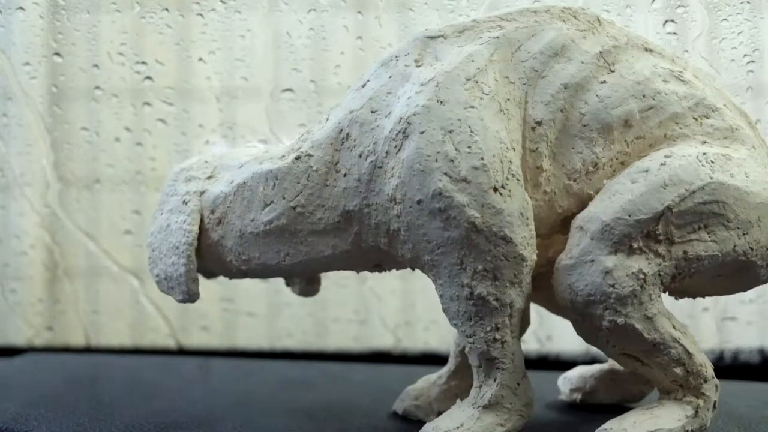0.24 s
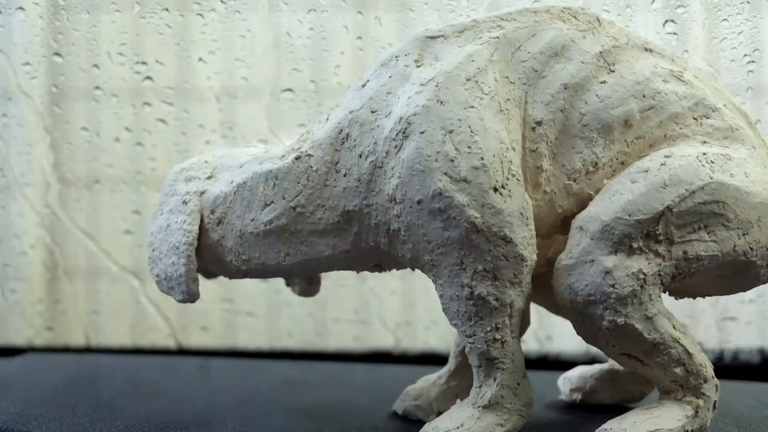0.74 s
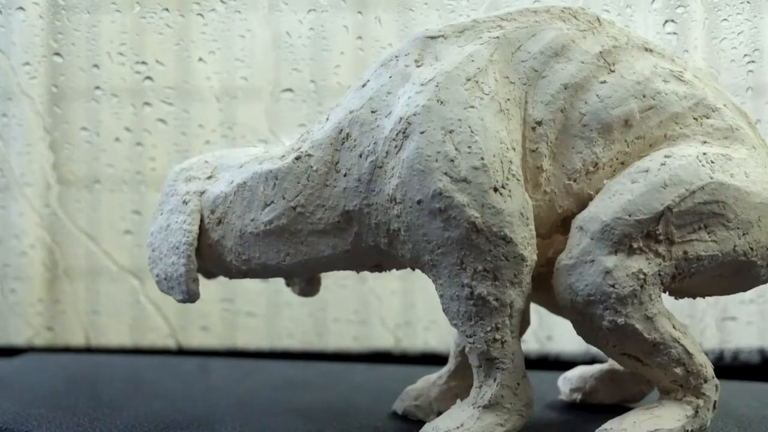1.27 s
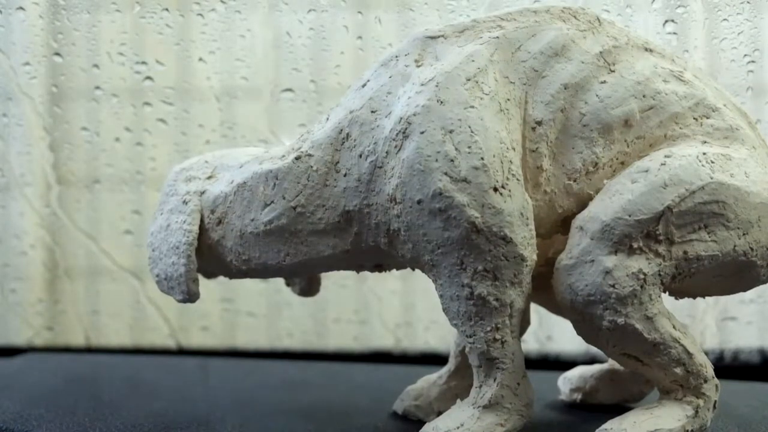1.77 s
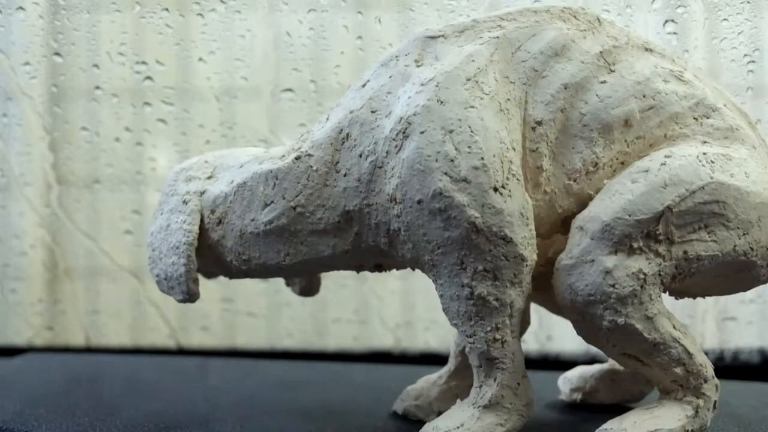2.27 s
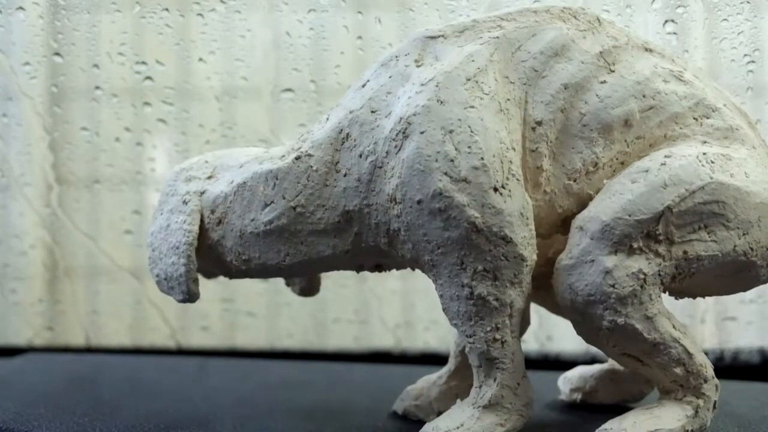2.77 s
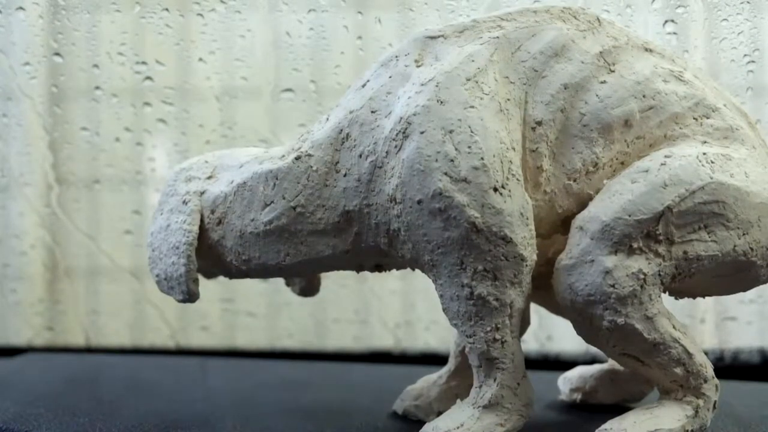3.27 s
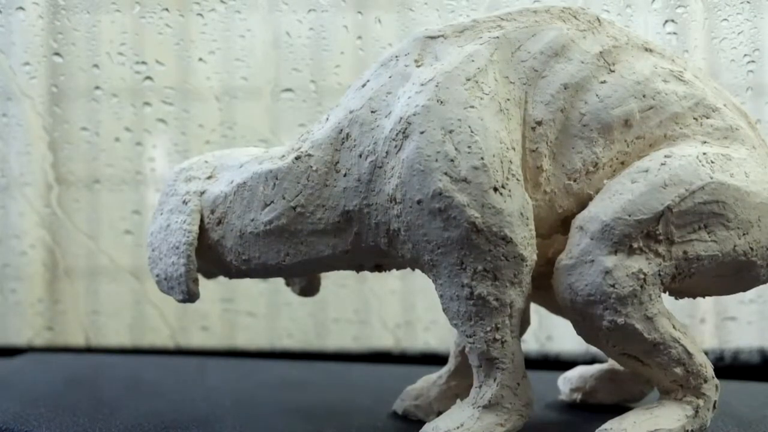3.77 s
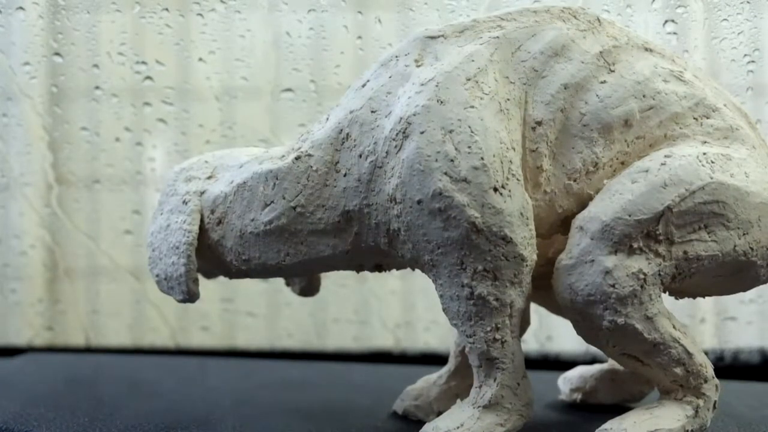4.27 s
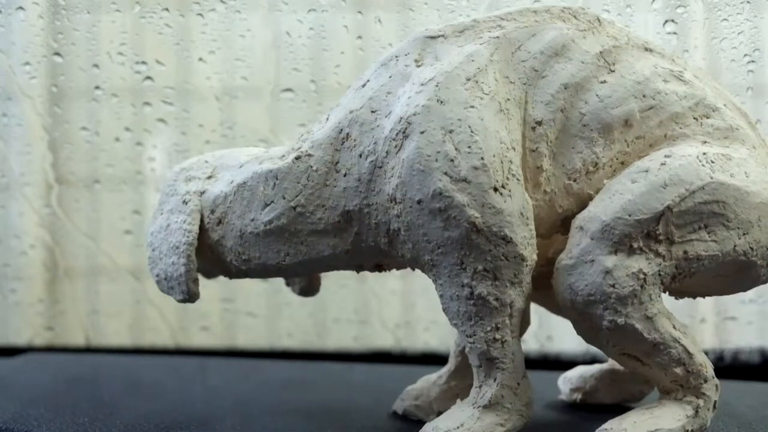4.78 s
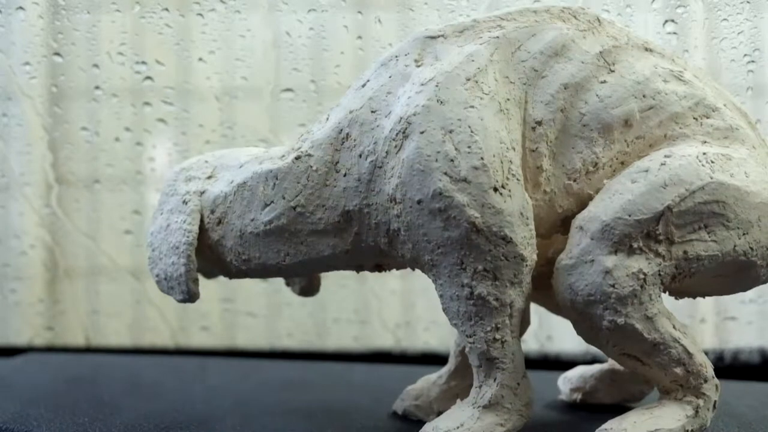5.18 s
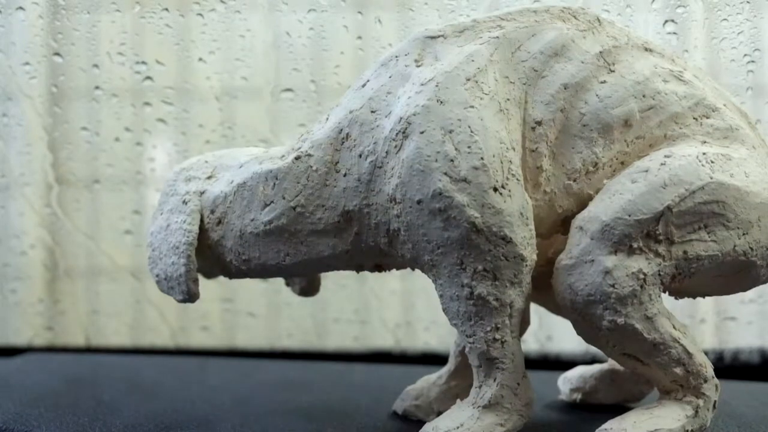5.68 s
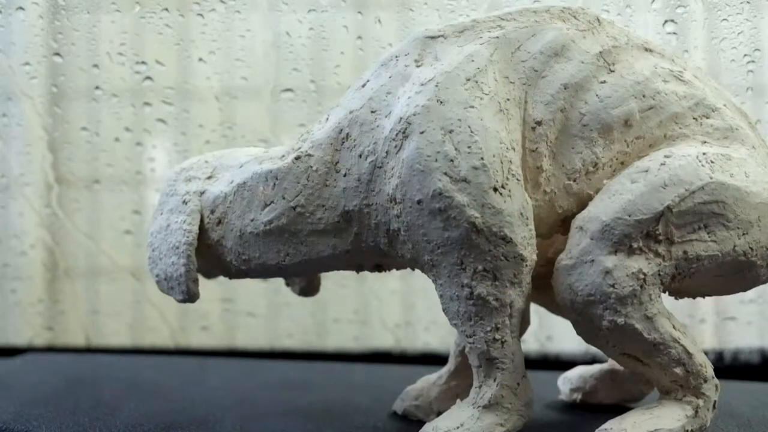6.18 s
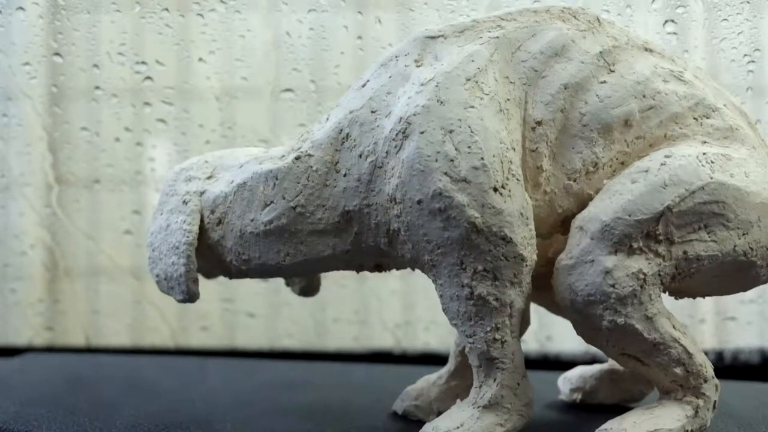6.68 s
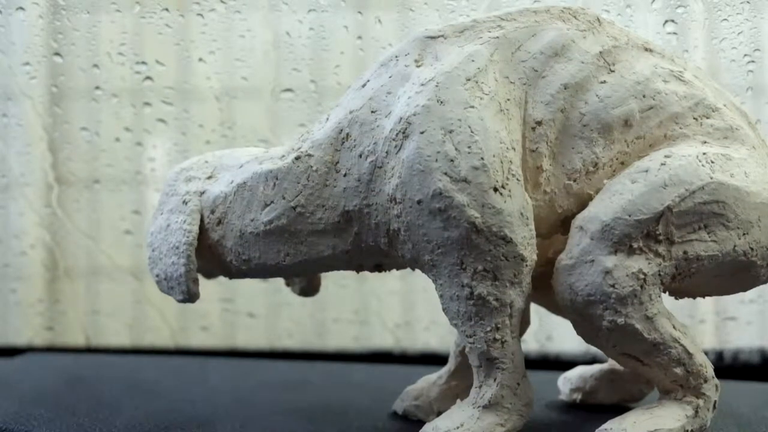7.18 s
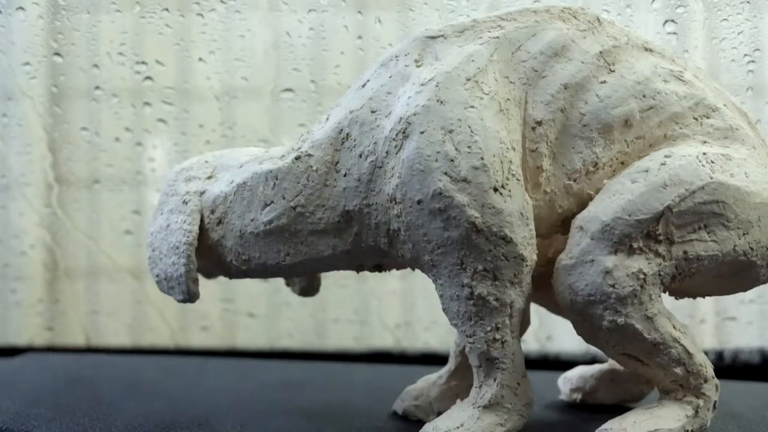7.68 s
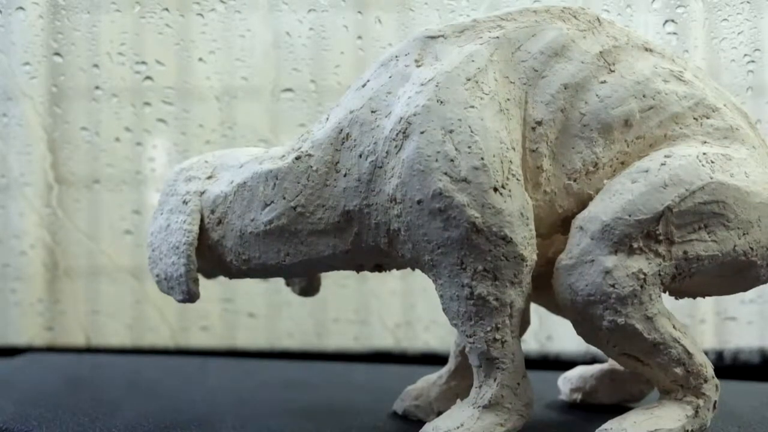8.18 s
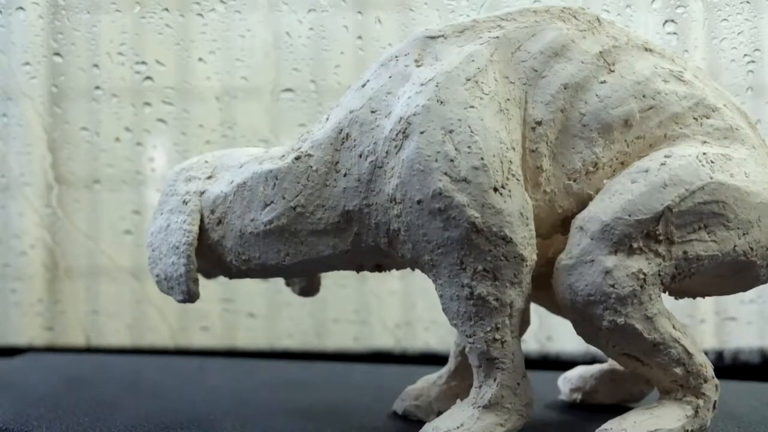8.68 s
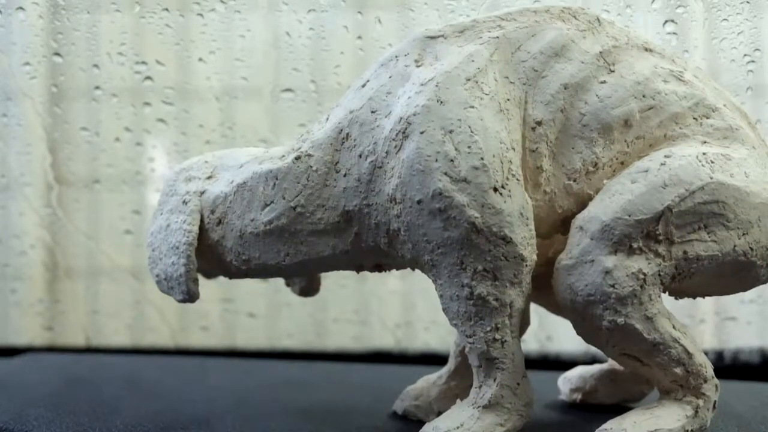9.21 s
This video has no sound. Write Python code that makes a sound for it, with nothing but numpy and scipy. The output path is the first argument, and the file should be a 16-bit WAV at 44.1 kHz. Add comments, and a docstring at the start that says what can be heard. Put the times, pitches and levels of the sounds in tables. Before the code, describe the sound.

Car wash heard from the cabin: fluttering wet cloth strips scrub the panels over low boom and motor hum, ending in louder, heavier knocks.

```python
"""Inside a car in an automatic wash

A spinning brush slaps the closed body about 22 times a second and scrubs it: noise shaped by a contact force.
The panels ring as resonances, the cabin booms, knocks excite low decaying modes, and water spatters the glass
as random impacts, over sinusoidal motor hum and faint hiss. The brush eases off briefly, bites again,
and drums harder as it comes close."""
import sys
import numpy as np
from scipy import signal
from scipy.fft import rfft, irfft, next_fast_len
from scipy.io import wavfile
from scipy.ndimage import uniform_filter1d

SR = 44100
rng = np.random.default_rng(int(sys.argv[2]) if len(sys.argv) > 2 else 0)


def wrap_up_sound(samples):
    """Save the sound to the file named by the first command line argument, as 16-bit audio."""
    columns = np.atleast_2d(samples).T
    # keep every value between -1 and 1, then stretch to whole-number steps
    tamed = np.clip(columns, -1, 1)
    steps = np.round(tamed * 32767).astype(np.int16)
    wavfile.write(sys.argv[1], SR, steps)


N = 416744

# Slap rate of the turning brush: start_s [s], slap_rate_hz [1/s]
BRUSH_RATE = [(0.0, 22.66), (1.0, 22.39), (2.0, 22.08), (3.0, 22.44), (4.0, 22.82), (5.0, 22.56),
              (6.0, 22.55), (7.0, 22.77), (8.0, 22.97), (9.45, 21.72)]


def strikes(scatter_db, jitter_s):
    """Periodic excitation: phase is integrated rate, and each whole cycle lands a row of strips, unevenly."""
    cycles = np.cumsum(curves(BRUSH_RATE)[0]) / SR + .24
    times = np.flatnonzero(np.diff(np.floor(cycles))) / SR
    timing, strength = rng.standard_normal((len(times), 2)).T
    gains = undb(scatter_db * np.clip(strength, -2, 1))
    return unit(blows(times + jitter_s * timing, gains, rise_s=.014, fall_s=.011))


# How the slaps, relative to the scrubbing, follow the brush: level_db [dB], pressure_slope [dB per dB],
# loose_change_db [dB, before the grip], close_change_db [dB], approach_lead_s [s], surge_db [dB, random]
STRIKE_LAW = (-3, 0.5, -7, -6, 0, 0.3)


def contact():
    """Power addition: steady scrubbing and slaps combine, then are normalized by the half-second rms."""
    bite = follow(STRIKE_LAW) * strikes(scatter_db=2.5, jitter_s=0.0015)
    force = np.sqrt(1 + bite ** 2)
    return force / np.sqrt(uniform_filter1d(force ** 2, SR // 2))


# How hard the brush presses on the car: start_s [s], pressure_db [dB]
PRESSURE_LEVEL = [(0, 2.5), (.2, 0), (.6, -2), (1.2, -5.5), (1.65, -3.5), (1.97, 0.5), (2.4, -0.1),
                  (2.8, -2.5), (3.35, 0.5), (5.1, -0.3), (5.55, 0), (7.3, 0), (8.1, -.5), (9.45, -1)]
# The wet brush takes hold of the car, and later closes in on the cabin
GRIP_S, GRIP_TAKES_S = 1.74, 0.19
APPROACH_S, APPROACH_TAKES_S = 6.3, 2.33


def follow(law):
    """Power-law coupling: level is linear in pressure, grip and closeness, plus slow random surges."""
    db, per_pressure, loose_db, close_db, lead_s, surge_db = law
    loose = 1 - ramp(GRIP_S, GRIP_TAKES_S)
    close = ramp(APPROACH_S - lead_s, APPROACH_TAKES_S)
    pressed_db = db + per_pressure * curves(PRESSURE_LEVEL)[0]
    return undb(pressed_db + loose_db * loose + close_db * close + surge_db * walk(rate=6))


# Relative spectra of the drumming shell, the flexing roof and the cabin boom: frequency_hz [Hz], density_db [dB per Hz]
DRUM_SPECTRUM = [(45, -43.5), (83, -6.5), (97, -3.5), (108, 1), (135, 2.5), (150, -3.5), (168, -4.5),
                 (183, -2.5), (200, -10.5), (220, -12.5), (260, -10), (305, -5), (400, -8), (470, -12.5),
                 (700, -18.5), (8000, -110)]
ROOF_SPECTRUM = [(100, -41), (160, -7.5), (183, 2), (205, -6.5), (255, -8), (320, -4), (380, -7),
                 (470, -16), (650, -16.5), (1200, -68)]
BOOM_SPECTRUM = [(15, -48), (26, -25), (32, -18), (37, -5.5), (43, -1), (51, -2.5), (62, -0.5), (77, -10),
                 (110, -26), (250, -65), (2000, -110)]
# How drumming and roof follow the brush: level_db [dB], pressure_slope [dB per dB],
# loose_change_db [dB], close_change_db [dB], approach_lead_s [s], surge_db [dB]
DRUM_LAW = (-34, 1.12, 0.5, 8, -0.01, 1)
ROOF_LAW = (-55.5, -1, 1, 22, 0.33, 1)
# Cabin boom, rolling as the brush comes close: start_s [s], level_db [dB]
BOOM_LEVEL_CURVE = [(0, -48), (.7, -52), (1.5, -55), (2.0, -40.5), (2.55, -38), (2.8, -47), (3.1, -39),
                    (3.65, -42.5), (3.82, -37.5), (4.05, -42), (4.34, -36), (4.55, -42), (5.3, -40),
                    (6.1, -42), (7.05, -38.5), (7.18, -35), (7.33, -40), (7.58, -30), (7.85, -36.5),
                    (8.2, -29), (8.6, -28.5), (8.8, -35), (8.95, -28.5), (9.15, -33), (9.45, -28)]
# Resonances of panels and glass: frequency_hz [Hz], width_hz [Hz], lift_db [dB]
PANEL_MODES = [(316, 14, 1.5), (328, 8.7, 1.5), (402, 31, 2.5), (791, 44, 6.5), (990, 40, 0.5),
               (1205, 35, -4), (1261, 37, 6.5), (1536, 40, 6.5), (1707, 19, 7.5), (2167, 46, -7),
               (2260, 65, 4.5), (2610, 53, -5), (3153, 58, -0.5), (3400, 44, 4.5), (3500, 58, -1.5),
               (3950, 580, -2), (4300, 63, 3), (4700, 64, 2)]


def body(force):
    """Forced vibration: the shell drums and booms, the roof joins in when the brush is close, knocks add rings."""
    drum = colour(noise() * force ** 0.29, DRUM_SPECTRUM, PANEL_MODES) * follow(DRUM_LAW)
    roof = colour(noise(), ROOF_SPECTRUM) * follow(ROOF_LAW)
    boom = colour(noise(), BOOM_SPECTRUM) * undb(curves(BOOM_LEVEL_CURVE)[0])
    return drum + roof + boom + knocks()


# Heavy knocks on the body: start_s [s], level_db [dB], length [factor], brightness [dB per octave]
BODY_KNOCKS = [(.185, -29, 1.3, 3.5), (1.955, -30, 0.91, -0.5), (2.091, -31, .7, 2.5),
               (2.234, -30, 0.65, 3), (4.0, -26, 2, -7), (4.3, -25, 2, -10), (4.46, -25, 2, -10),
               (4.67, -25, 2.4, -10), (4.79, -31.5, 1.3, 4.5), (5.16, -24, 1.8, -7), (5.85, -25, 1.8, -8),
               (6.031, -27.5, 1, 2), (6.21, -25, 1.2, -7), (6.739, -22, 2.2, -16), (7.207, -23, 0.81, 3),
               (7.296, -19, 2.4, -10), (7.99, -27, 1.4, -2), (8.14, -20, 1, 2), (8.29, -22, 2.2, 0.5),
               (8.485, -19, 1.7, 2.5), (8.66, -26.5, 1.8, 1), (8.768, -11.5, 1.3, -7), (8.818, -17, 1.1, 0),
               (8.922, -17.5, 2.6, -11), (8.965, -23, 0.87, 3), (9.104, -20, 1.1, 0),
               (9.201, -10.5, 0.91, 0.5)]
# Shell modes before detuning and scaling by length: frequency_hz [Hz], level_db [dB], decay_s [s]
SHELL_MODES = [(117.3, -0.5, 0.022), (171.2, -3.5, 0.021), (291, -7, 0.014), (343, -4.5, .019),
               (696, -12, .012)]
KNOCK_RISE_S = 0.0066  # for a length factor of one


def knocks():
    """Modal decay: each knock rings a few low shell modes; a soft, long push makes a dull swell."""
    t = np.arange(SR // 2) / SR
    out = np.zeros(N + len(t))
    lowest_hz = SHELL_MODES[0][0]
    detunings = rng.standard_normal((len(BODY_KNOCKS), len(SHELL_MODES)))
    for (s, level_db, length, tilt_db), detuning in zip(BODY_KNOCKS, detunings):
        ring = 0
        for (hz, db, decay_s), d in zip(SHELL_MODES, detuning):
            gain = undb(db + tilt_db * np.log2(hz / lowest_hz))
            tone = np.sin(2 * np.pi * hz * (1 + 0.026 * d) * t)
            ring = ring + gain * np.exp(-t / (decay_s * length)) * tone
        onset = 1 - np.exp(-t / (KNOCK_RISE_S * length))
        start = int(s * SR)
        out[start:start + len(t)] += undb(level_db) * ring * onset
    return out[:N] * np.array([[1], [0]])  # mid only


# Relative spectra of scrubbing cloth and of hard slaps: frequency_hz [Hz], density_db [dB per Hz]
CLOTH_SPECTRUM = [(150, -12), (400, -6.5), (600, -4.5), (740, 2), (880, 0.5), (1060, 0.5), (1200, -8.5),
                  (1700, -16.5), (2400, -16), (3500, -23.5), (7000, -38.5), (16000, -86)]
SLAP_SPECTRUM = [(250, -23.5), (580, -9), (740, 3.5), (1080, 2), (1300, -17), (2400, -13.5), (4000, -38.5),
                 (16000, -62)]
# Hard slaps of the cloth: start_s [s], level_db [dB]
HARD_SLAPS = [(.143, -38), (.172, -41), (.26, -40), (.301, -41), (.432, -37), (0.66, -39), (1.955, -31),
              (2.092, -30.5), (2.145, -32), (2.182, -35), (2.238, -30.5), (2.316, -31), (2.37, -32.5),
              (2.461, -35), (2.674, -39.5), (2.807, -41), (2.998, -35), (3.332, -31), (3.627, -28),
              (3.656, -32.5), (4.054, -39), (4.1, -36), (4.586, -35), (4.815, -32), (4.924, -34),
              (5.025, -36), (5.111, -35), (5.199, -33), (5.55, -40), (6.09, -33.5), (6.178, -35),
              (6.27, -32.5), (6.614, -40), (7.7, -36), (7.761, -31), (8.455, -30), (8.506, -25.5),
              (8.588, -30.5), (8.99, -29.5), (9.04, -28), (9.229, -28.5), (9.357, -32)]
# How scrubbing follows the brush: level_db [dB], pressure_slope [dB per dB],
# loose_change_db [dB], close_change_db [dB], approach_lead_s [s], surge_db [dB]
SCRUB_LAW = (-40.5, 1.38, -0.3, 6, 0, 0.17)


def cloth(force):
    """Impact excitation: many wet strips patter on the resonant panels, and some land hard."""
    scrub = roaming(patter(rate=10000, spread_db=1.5) * force, CLOTH_SPECTRUM)
    s, db = np.transpose(HARD_SLAPS)
    slaps = blows(s, undb(db), rise_s=.001, fall_s=.013)
    return scrub * follow(SCRUB_LAW) + colour(noise(), SLAP_SPECTRUM, PANEL_MODES) * slaps


# Share by which the ringing moves up or down as strips land in new places, and how often it moves
PANEL_SHIFT, PANEL_SHIFTS_PER_S = 0.013, 7


def roaming(x, table):
    """Position-dependent resonance: a moving crossfade joins panels tuned slightly low and slightly high."""
    place = .5 + .5 * np.tanh(2 * walk(rate=PANEL_SHIFTS_PER_S))
    low = colour(x, table, np.array(PANEL_MODES) * [1 - PANEL_SHIFT, 1, 1])
    high = colour(x, table, np.array(PANEL_MODES) * [1 + PANEL_SHIFT, 1, 1])
    return low * (1 - place) + high * place


# Relative spectrum of the spray: frequency_hz [Hz], density_db [dB per Hz]
SPRAY_SPECTRUM = [(500, -11), (1300, 1), (1800, 2.5), (2450, 1), (3100, -7), (4000, -7.5), (4900, -12),
                  (5600, -21.5), (6600, -22), (8000, -26), (11000, -31), (16000, -41)]
# Level of the spray: start_s [s], level_db [dB]
SPRAY_LEVEL_CURVE = [(0, -53.5), (.7, -54.5), (1.6, -54), (1.95, -49.5), (2.3, -49), (2.7, -50.5),
                     (3.15, -50), (3.4, -48.5), (6.1, -48), (6.8, -46.5), (7.2, -45.5), (7.5, -46),
                     (8.3, -44.5), (8.7, -43.5), (9.1, -43.5), (9.45, -43)]


def water(force):
    """Modulated shot noise: spray leaves the strips in sheets that break into overlapping clumps of drops."""
    clumps = undb(0.6 * walk(rate=28) + 1.3 * walk(rate=130))
    spatter = patter(rate=6000, spread_db=-0.5) * force ** 0.58 * clumps
    return roaming(spatter, SPRAY_SPECTRUM) * undb(curves(SPRAY_LEVEL_CURVE)[0])


# Relative spectra of the dull splat and the sharp tick: frequency_hz [Hz], density_db [dB per Hz]
SPLAT_SPECTRUM = [(500, -14), (1300, -2), (2450, 0), (3100, -5), (4800, -10), (5600, -18), (8000, -28),
                  (16000, -48)]
TICK_SPECTRUM = [(1000, -23), (2500, 12), (3400, 1.5), (4400, 0.5), (5300, -7), (6700, -12.5), (8500, -28),
                 (12000, -27), (16000, -34)]
# Big splashes landing on the car: start_s [s], level_db [dB], sharp_share [0-1 of power]
BIG_SPLASHES = [(1.604, -50, .2), (1.862, -50, .2), (1.91, -46, .2), (1.955, -42.5, .1), (2.016, -46, .05),
                (2.053, -44.5, 0.7), (2.089, -46, 0.1), (2.145, -46, .05), (2.174, -47, .3),
                (2.25, -47, .4), (2.312, -49, .2), (2.458, -44.5, .05), (2.946, -44.5, .35),
                (3.223, -45, 0.2), (3.438, -42.5, .1), (3.485, -42, 0.1), (3.57, -44.5, 0),
                (3.634, -48, 0.1), (3.743, -43, .2), (3.775, -49, 0.3), (3.821, -43.5, 0.2),
                (3.863, -44, 0), (4.099, -48, 0), (4.157, -51, 0), (4.277, -41, 0.14), (4.388, -44, .5),
                (4.444, -48, .5), (4.485, -45, 0.2), (4.583, -47, .35), (4.64, -48, 0.2), (4.81, -43.5, 0),
                (4.929, -46, 0), (5.018, -38.5, .7), (5.149, -44.5, 0.2), (5.342, -50, 0),
                (5.453, -44.5, .2), (5.507, -55, 0.1), (5.827, -46, 0.1), (5.873, -42, 0.1),
                (5.908, -49, 0.1), (6.27, -50, 0), (6.313, -47, 0), (6.34, -44, 0), (6.519, -44, 0.1),
                (6.707, -42, 0), (6.743, -47, 0.2), (6.834, -46.5, 0.1), (6.96, -41, .05),
                (7.003, -42.5, 0.24), (7.15, -45, 0.1), (7.186, -44, .1), (7.222, -41, 0), (7.282, -45, .1),
                (7.416, -46, 0), (7.579, -50, 0), (7.763, -45, .05), (7.801, -43, 0), (7.927, -41, 0),
                (8.488, -50, 0), (8.536, -44, 0), (8.698, -41, 0.1), (9.014, -46, .6), (9.114, -37.5, 0.46),
                (9.212, -42, 0)]
SPLASH_TAIL_DB = -11  # relative to the splat


def splashes():
    """Clustered impacts: drops make a dull splat, a sharp tick on the glass and a short wet tail."""
    s, db, sharp = np.transpose(BIG_SPLASHES)
    out = 0
    for table, share in ((SPLAT_SPECTRUM, 1 - sharp), (TICK_SPECTRUM, sharp)):
        gains = undb(db) * np.sqrt(np.clip(share, 0, 1))
        splat = blows(s, gains, rise_s=.008, fall_s=.011)
        tail = blows(s, gains * undb(SPLASH_TAIL_DB), rise_s=.02, fall_s=.03)
        cluster = colour(patter(rate=5000, spread_db=1.2), table, PANEL_MODES)
        out = out + cluster * np.hypot(splat, tail)
    return out


# Big single drops on the glass: start_s [s], level_db [dB], pitch_hz [Hz]
BIG_DROPS = [(1.608, -54, 6500), (1.958, -37, 2700), (2.057, -42, 4400), (2.094, -39, 2970),
             (2.259, -52, 6200), (2.770, -54, 7000), (3.890, -54, 6500), (4.276, -52, 7000),
             (4.285, -37, 2420), (4.288, -50, 6000), (4.394, -47, 5000), (4.589, -51, 6200),
             (4.814, -55, 6500), (5.020, -39, 4830), (5.025, -35, 3300), (6.963, -36, 2780),
             (6.965, -33.5, 4350), (6.969, -36, 4350), (7.007, -48, 4700), (7.904, -56, 7000),
             (8.605, -51, 7000), (8.803, -50, 6900), (8.967, -45, 6600), (9.094, -51, 7000),
             (9.251, -51, 7000)]
# Sprinkle of small drops: pitch range, then level relative to the spray
SPRINKLE_PER_S, SPRINKLE_LOW_HZ, SPRINKLE_OCTAVES = 45, 1400, 2
SPRINKLE_DB, SPRINKLE_RANGE_DB, SPRINKLE_DB_PER_OCTAVE = 11, 10, -7
DROP_RING_S, DROP_CLICK_S, DROP_CLICK_DB, GLASS_TOP_HZ = .003, .003, -6, 4800


def drops():
    """Damped oscillation: each drop clicks and rings; a few are big, and a sprinkle follows the spray."""
    wet_s = N / SR - GRIP_S
    when, pitch, size = rng.random((int(SPRINKLE_PER_S * wet_s), 3)).T
    s = GRIP_S + when * wet_s
    octaves = SPRINKLE_OCTAVES * pitch
    hz = SPRINKLE_LOW_HZ * 2 ** octaves
    db = np.interp(s, *np.transpose(SPRAY_LEVEL_CURVE)) + SPRINKLE_DB
    db = db - SPRINKLE_RANGE_DB * size + SPRINKLE_DB_PER_OCTAVE * octaves
    t = np.arange(SR // 40) / SR
    glass = signal.butter(4, GLASS_TOP_HZ, fs=SR, output="sos")
    out = np.zeros((2, N + len(t)))
    for at_s, level_db, ring_hz in [*BIG_DROPS, *zip(s, db, hz)]:
        ring = np.exp(-t / DROP_RING_S) * np.sin(2 * np.pi * ring_hz * t)
        burst = np.exp(-t / DROP_CLICK_S) * rng.standard_normal(len(t))
        click = undb(DROP_CLICK_DB) * signal.sosfilt(glass, burst)
        start = int(np.clip(at_s * SR, 0, N))
        mid_side = [1, rng.uniform(-1, 1)]  # random place from left to right
        out[:, start:start + len(t)] += np.outer(mid_side, undb(level_db) * (ring + click))
    return out[:, :N]


# Motor hum before wavering: pitch_hz [Hz], level_db [dB, relative]
HUM_TONES = [(59.2, -17), (118.6, -7), (178, -13.5)]
# How the hum follows the brush: level_db [dB], pressure_slope [dB per dB],
# loose_change_db [dB], close_change_db [dB], approach_lead_s [s], surge_db [dB]
HUM_LAW = (-43.3, 1, 0.5, 6.5, 0.5, 0)


def motors():
    """Amplitude and phase modulation: hum comes through the shell as the brush presses, wavering."""
    t = np.arange(N) / SR
    hum = 0
    for hz, db in HUM_TONES:
        phase = 2 * np.pi * hz * t + 1.48 * walk(rate=16)
        hum = hum + undb(db + 2.3 * walk(rate=7.6)) * np.sin(phase)
    return unit(hum) * follow(HUM_LAW) * np.array([[1], [0]])  # mid only


# Relative spectrum of the hiss: frequency_hz [Hz], density_db [dB per Hz]
HISS_SPECTRUM = [(1000, 5), (4000, 3), (6500, 0), (9000, -3.3), (12000, -6.8), (16000, -11.3)]


def hiss():
    """Stationary noise: a faint, even hiss lies under everything."""
    return colour(noise(), HISS_SPECTRUM) * undb(-63.3)


# The two microphones: frequency_hz [Hz], diffuse_db [dB], left_minus_right_db [dB], left_lead_rad [rad]
MICROPHONE_PAIR = [(32, -26, 7.6, -1), (47, -28, 6.8, -.97), (120, -30, 1.8, -.62), (300, -25, -.1, -.24),
                   (800, -21, -.6, -.12), (1300, -13, -.8, -.06), (2400, -11, -.8, 0), (4500, -5, -1, .33),
                   (8000, -.7, -.7, 1), (15000, -.8, 0, 1)]


def microphones(sound):
    """Spatial coherence: bass is alike but stronger on the left, treble is diffuse."""
    diffuse_db, balance_db, lead = across(MICROPHONE_PAIR)
    mid, side = rfft(sound, 2 * len(lead) - 2)
    side = side * undb(diffuse_db)
    lean = undb(balance_db / 2) * np.exp(.5j * lead)
    return irfft(np.array([(mid + side) * lean, (mid - side) / lean]))[:, :N]


def blows(times, gains, rise_s, fall_s):
    """Incoherent addition: blows swell quickly and die away, and their powers add."""
    t = np.arange(SR // 4) / SR
    shape = (1 - np.exp(-t / rise_s)) * np.exp(-t / fall_s)
    power = np.zeros(N + len(t))
    for s, gain in zip(times, gains):
        start = int(np.clip(s * SR, 0, N))
        power[start:start + len(t)] += (gain * shape / shape.max()) ** 2
    return np.sqrt(power[:N])


def patter(rate, spread_db):
    """Shot noise: tiny impacts at random moments, with exponentially spread levels; rms one."""
    lands = rng.random(N) < rate / SR
    size = undb(spread_db * np.minimum(rng.exponential(size=N), 5))
    return unit(noise() * lands * size)


def colour(x, table, modes=()):
    """Minimum-phase filtering: a smooth spectrum with resonant peaks; rms one."""
    hz, db = bins(), across(table)[0]
    for centre, width, lift in modes:
        db = db + lift / (1 + (2 * (hz - centre) / width) ** 2)
    cepstrum = irfft(np.log(undb(db)))
    size = len(cepstrum)
    # folding the cepstrum onto positive time makes the filter causal
    response = np.exp(rfft(2 * cepstrum[:size // 2], size))
    return unit(irfft(rfft(x, size) * response)[:, :N])


def noise():
    """White noise: two unrelated signals, direct (mid) and diffuse (side)."""
    return rng.standard_normal((2, N))


def walk(rate):
    """Random modulation: levels drawn rate times a second, joined by straight slopes; rms one."""
    k = max(int(SR / rate), 1)
    held = np.repeat(rng.standard_normal(N // k + 1), k)
    return unit(uniform_filter1d(held, k)[:N])


def ramp(start_s, takes_s):
    """Linear transition: rise evenly from zero to one and stay there."""
    return np.clip((np.arange(N) / SR - start_s) / takes_s, 0, 1)


def curves(table):
    """Linear interpolation: each column of a timed table, sample by sample."""
    s, *columns = np.transpose(table)
    return [np.interp(np.arange(N) / SR, s, c) for c in columns]


def across(table):
    """Logarithmic frequency scale: each column of a frequency table, joined by octaves."""
    hz, *columns = np.transpose(table)
    octave = np.log2(bins() + 1)  # one is added to avoid log of zero
    return [np.interp(octave, np.log2(hz), c) for c in columns]


def bins():
    """Discrete spectrum: frequencies of a transform a little longer than the scene."""
    return np.linspace(0, SR / 2, next_fast_len(N // 2 + 4096, True) + 1)


def undb(db):
    """Decibel law: level to amplitude gain."""
    return 10 ** (np.asarray(db) / 20)


def unit(x):
    """Rms normalization: scale to an rms of one."""
    return x / np.sqrt(np.mean(x ** 2))


def scene():
    """Superposition: one brush force drives body, cloth and spray; the other sources add to them."""
    force = contact()
    brush = body(force) + cloth(force) + water(force)
    return microphones(brush + splashes() + drops() + motors() + hiss())


def record(dry):
    """Band limitation: a steep elliptic low-pass cuts the top of the spectrum."""
    return signal.sosfilt(signal.ellip(10, .2, 80, 15650, fs=SR, output="sos"), dry)


dry = scene()
out = record(dry)
wrap_up_sound(out)
```